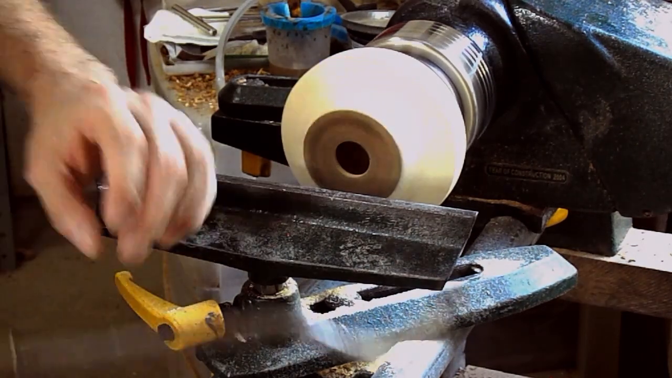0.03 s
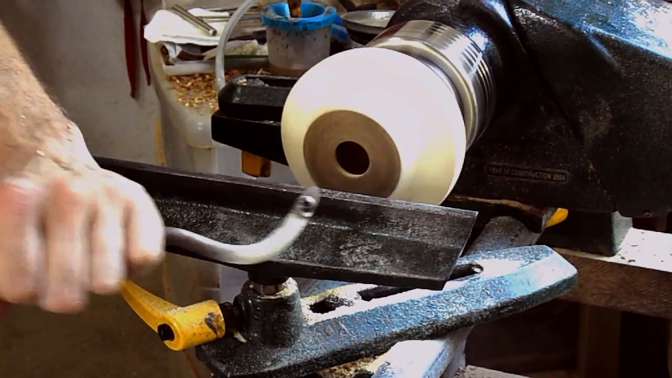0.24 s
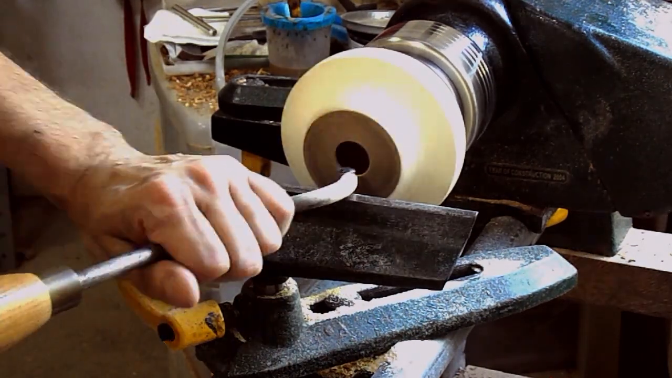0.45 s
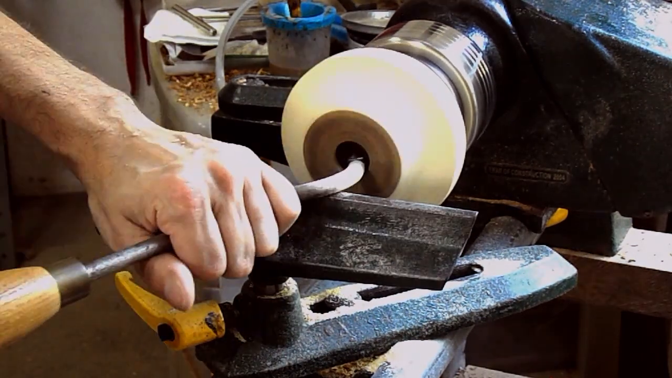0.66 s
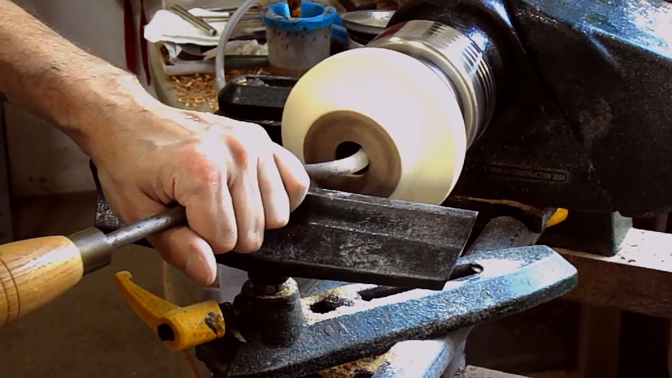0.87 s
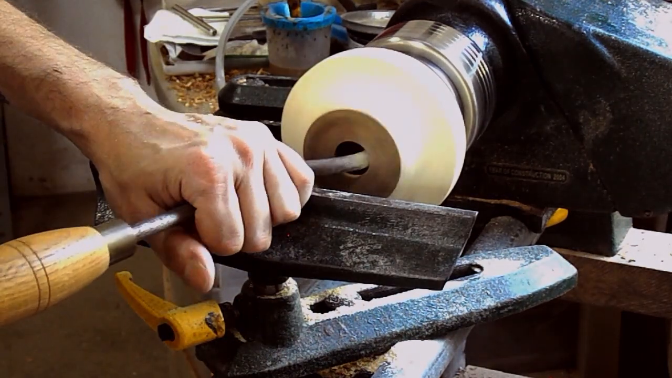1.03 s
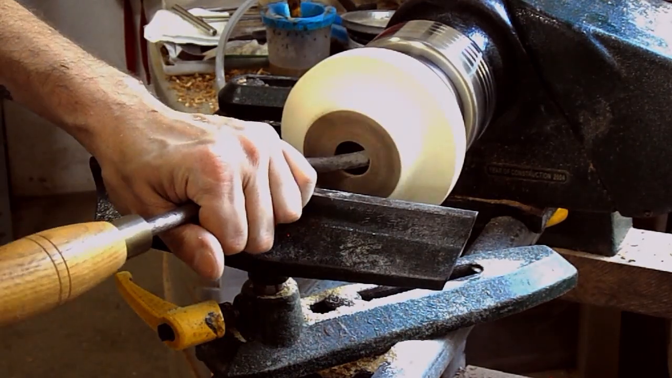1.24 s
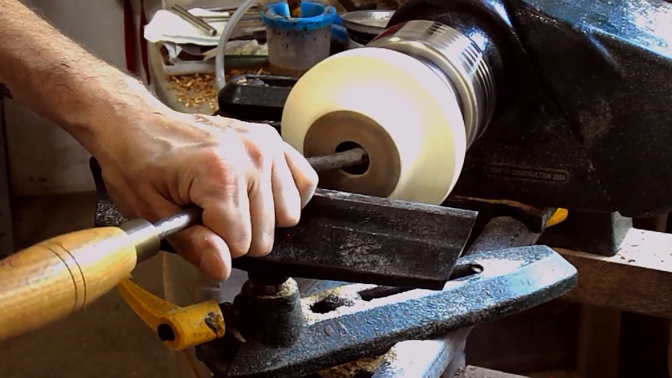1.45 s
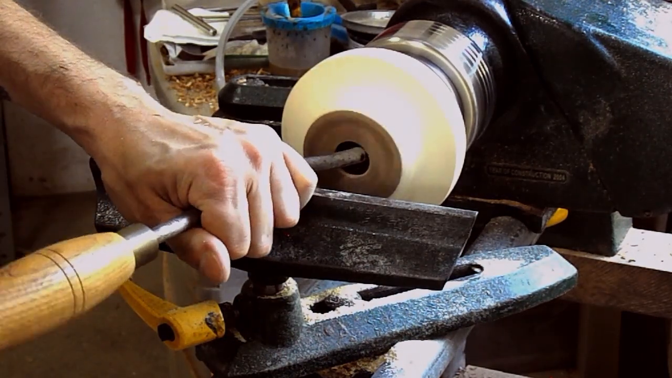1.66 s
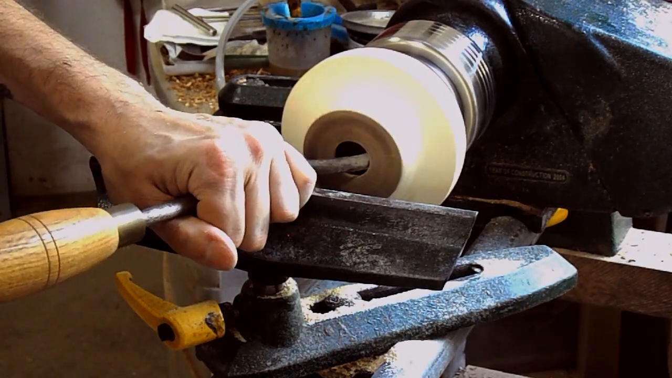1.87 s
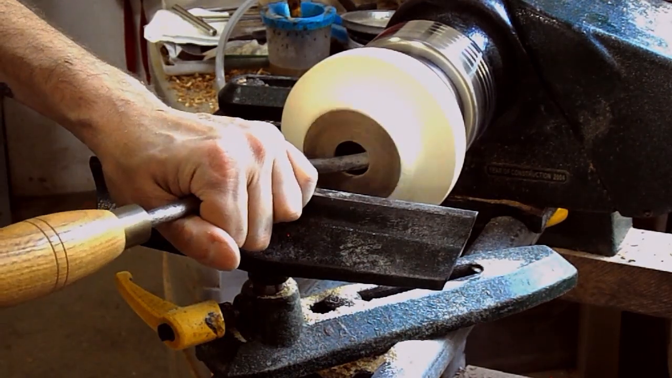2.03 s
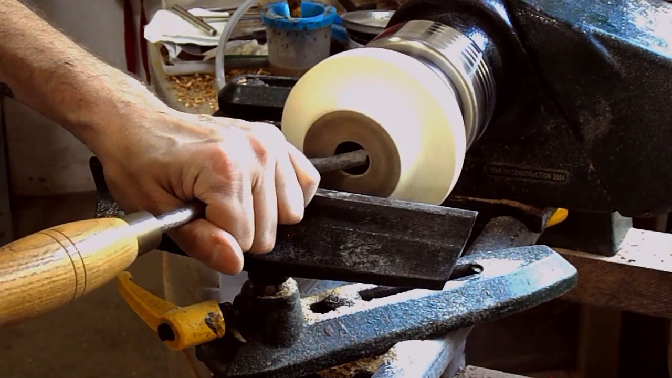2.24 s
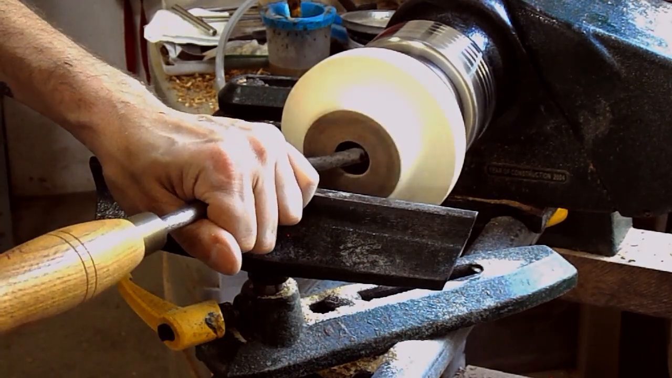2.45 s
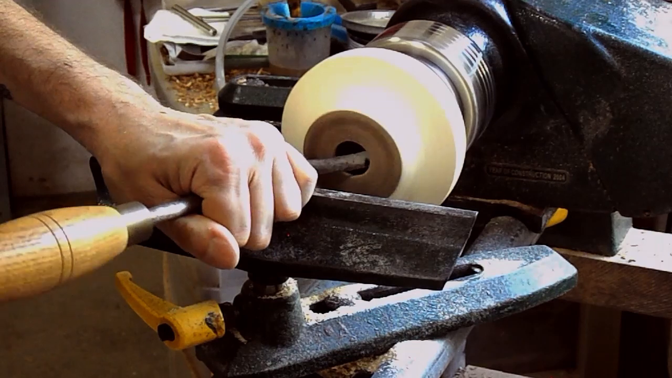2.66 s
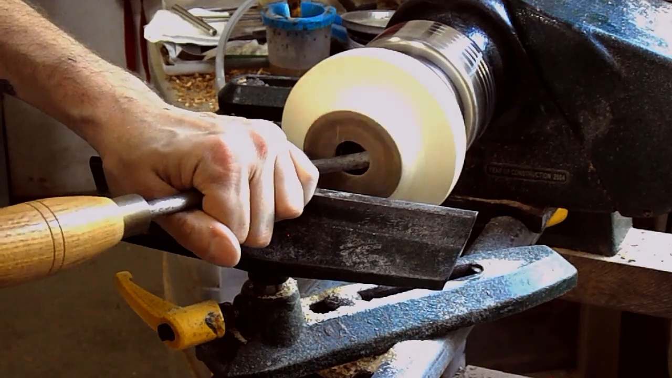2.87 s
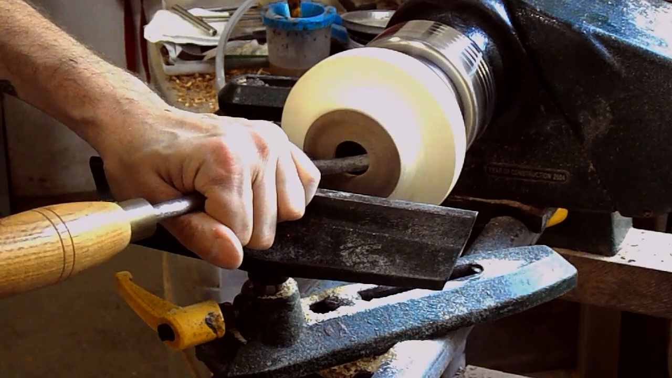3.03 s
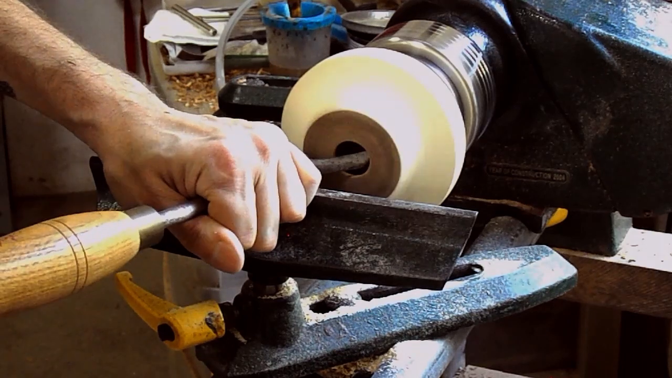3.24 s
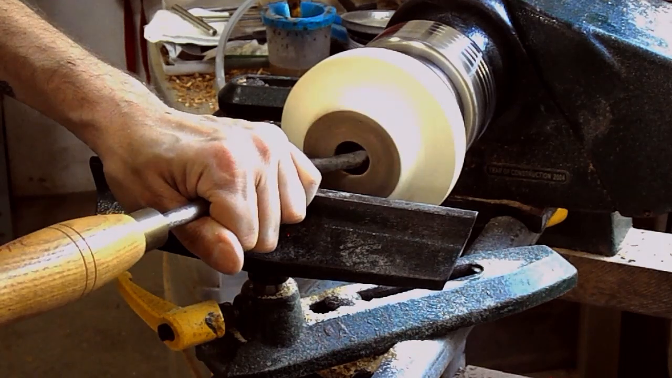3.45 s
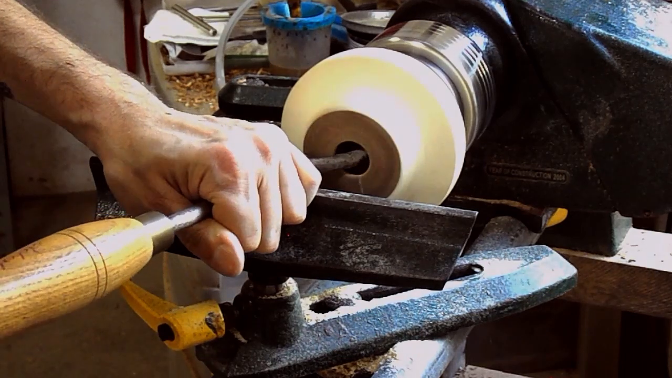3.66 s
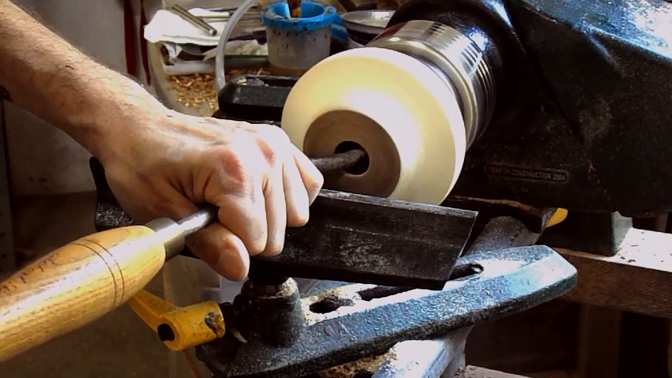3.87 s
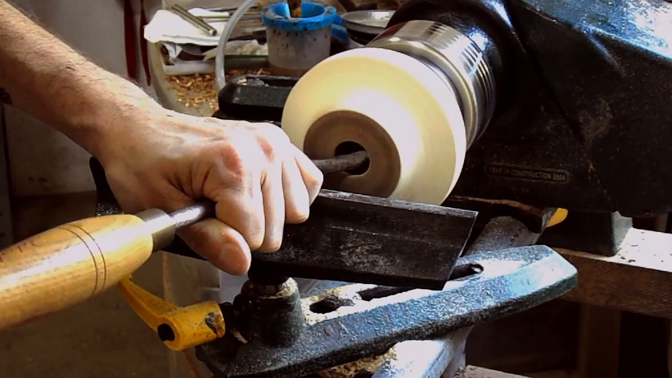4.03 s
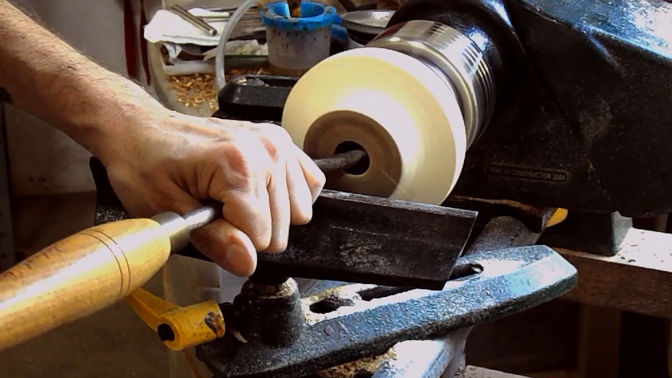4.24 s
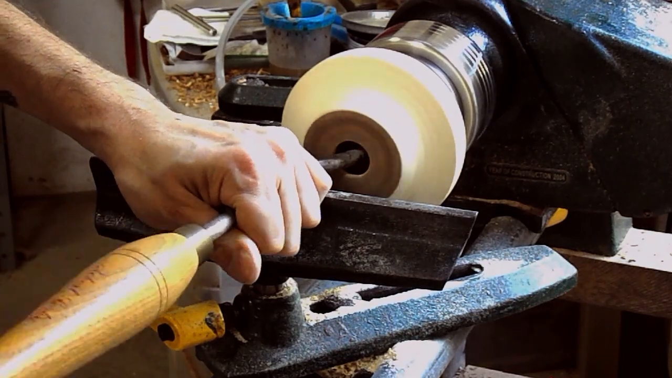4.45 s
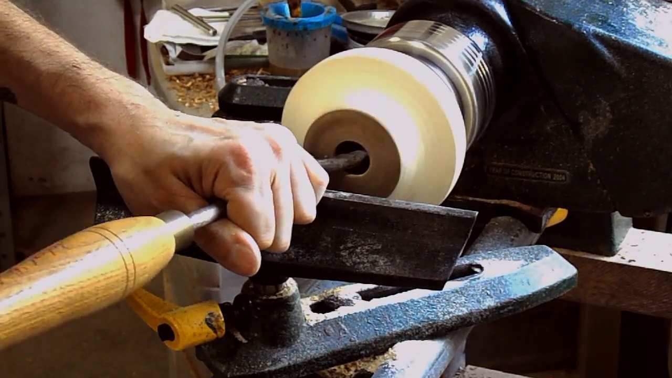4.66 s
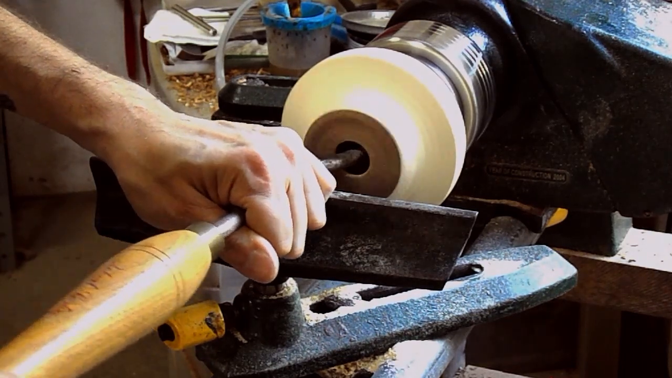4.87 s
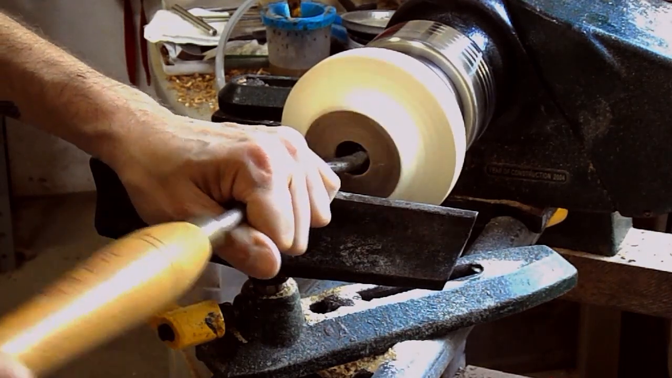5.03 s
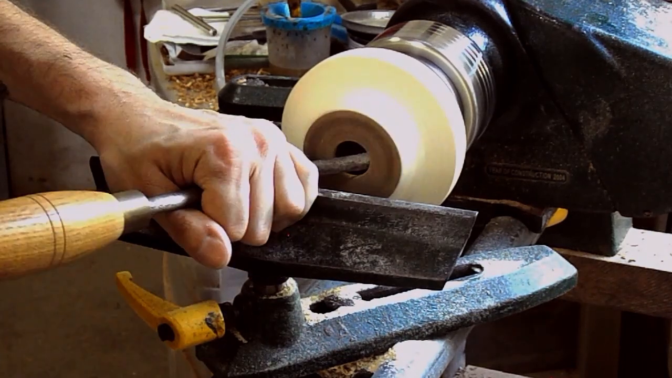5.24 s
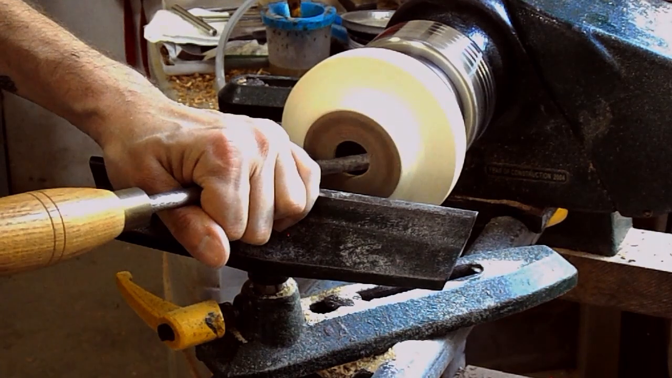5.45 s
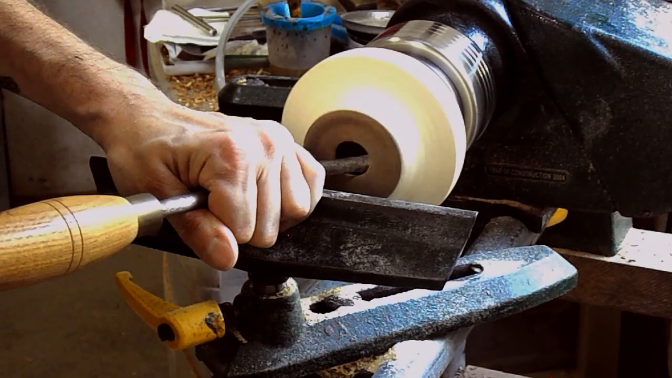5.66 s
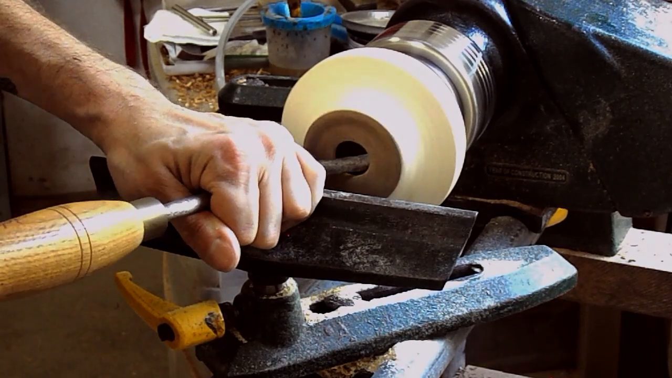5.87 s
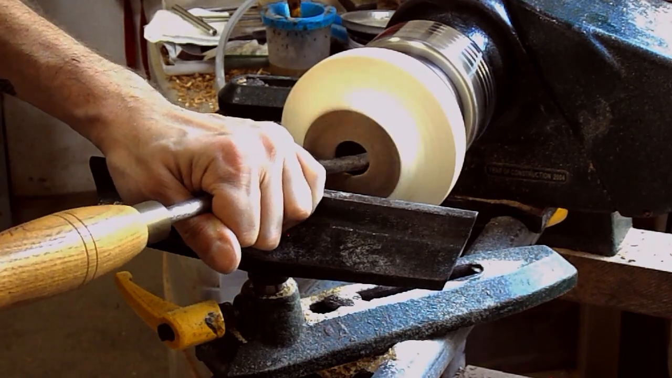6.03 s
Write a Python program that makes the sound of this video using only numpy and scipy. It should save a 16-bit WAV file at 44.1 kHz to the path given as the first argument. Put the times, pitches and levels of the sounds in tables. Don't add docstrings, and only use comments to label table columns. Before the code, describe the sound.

A wood lathe hisses and whines steadily while a hooked tool hollows a spinning piece in bright, raspy bursts with sharp spitting catches.

```python
import sys
import numpy as np
from scipy import signal
from scipy.fft import rfft, irfft, next_fast_len
from scipy.io import wavfile
from scipy.ndimage import uniform_filter1d

SR = 44100
rng = np.random.default_rng(int(sys.argv[2]) if len(sys.argv) > 2 else 0)


def file_out(sig):
    cols = np.atleast_2d(sig).T
    lim = np.clip(cols, -1, 1)
    pcm = np.round(lim * 32767).astype(np.int16)
    wavfile.write(sys.argv[1], SR, pcm)


def boost_factor(decibels):
    exponent = np.asarray(decibels, float) / 20
    return 10 ** exponent


N = 268993


def rms_one(x):
    return x / np.sqrt(np.mean(x ** 2) + 1e-20)


def in_time(rows, **ends):
    times, *columns = np.transpose(rows)
    t = np.arange(N) / SR
    return [np.interp(t, times, column, **ends) for column in columns]


def at_hz(points, hz):
    point_hz, point_db = np.transpose(points)
    return np.interp(np.log(hz + 1), np.log(point_hz), point_db)


def drift(rate):
    step = 40
    r = np.exp(-2 * np.pi * step * rate / SR)
    slow = signal.lfilter([1], [1, -2 * r, r * r], rng.standard_normal(N // step + 2002))[2000:]
    return np.interp(np.arange(N) / step, np.arange(len(slow)), rms_one(slow))


def coloured(x, spectrum, lifts, low_hz, high_hz):
    size = next_fast_len(N)
    hz = np.fft.rfftfreq(size, 1 / SR)
    db = at_hz(spectrum, hz)
    for f, width, lift_db in lifts:
        db = db + lift_db / (1 + (2 * (hz - f) / width) ** 2)
    z = rfft(x, size) * boost_factor(db)
    inside = abs(z[:, (hz > low_hz) & (hz < high_hz)]) ** 2
    return irfft(z, size)[:, :N] * size / np.sqrt(np.sum(inside))


def resonate(x, hz, width):
    r = np.exp(-np.pi * width / SR)
    poles = [1, -2 * r * np.cos(2 * np.pi * hz / SR), r * r]
    return signal.lfilter([(1 - r * r) / 2, 0, (r * r - 1) / 2], poles, x)


def paired(x, turn=8.5):
    walk = turn * np.cumsum(rng.standard_normal(N)) / np.sqrt(SR)
    walk = uniform_filter1d(walk, size=256)
    whole = signal.hilbert(x, next_fast_len(N))[:N]
    sides = np.array([[1], [-1]])
    return np.real(whole * np.exp(.5j * walk * sides))


def hum(modes, steady, turn):
    out = 0
    for hz, width, db in modes:
        tone = resonate(rng.standard_normal(N), hz, width)
        tone = rms_one(resonate(tone, hz, 3 * width))
        height = np.sqrt(uniform_filter1d(tone ** 2, size=400) + 0.023)
        out = out + boost_factor(db) * rms_one(tone / height ** steady)
    return paired(rms_one(out), turn)


def grains(per_s, spread_db, alike_hz):
    size_db = spread_db * np.minimum(rng.exponential(1, (3, N)), 4)
    sizes = boost_factor(size_db) * rng.standard_normal((3, N))
    x = rms_one(sizes * (rng.random((3, N)) < per_s / SR))
    low, high = (signal.butter(1, alike_hz, kind, fs=SR) for kind in ("low", "high"))
    return signal.lfilter(*low, paired(x[0])) + signal.lfilter(*high, x[1:])


# f [Hz], level [dB per Hz]
MACHINE = [(25, -50), (60, -28.5), (120, -16), (200, -14), (330, -2), (480, -9), (700, -10.5), (1000, 0.5),
           (1300, -13), (2000, -11), (2400, -15.5), (3800, -15.5), (5200, -17), (12000, -19),
           (16000, -24.5)]
# f [Hz], width [Hz], lift [dB]
CASTING = [(258, 20, 5), (358, 50, 5), (555, 25, 5), (661, 25, 5), (754, 20, 5), (1403, 30, 4),
           (1785, 40, 4), (1934, 60, 7), (2090, 50, 4), (2380, 35, 4), (4120, 120, 7), (4500, 450, 5),
           (5950, 300, 3), (3000, 1300, -3)]
# f [Hz], width [Hz], level [dB]
WHINE_MODES = [(932, 16, -9), (984, 5, 0), (1038, 7, -5), (445, 5, -3)]


def lathe():
    hiss = coloured(grains(per_s=47000, spread_db=2.1, alike_hz=1040), MACHINE, CASTING, 25, 21000)
    whine = hum(WHINE_MODES, steady=0.42, turn=7.4)
    hiss_db = -42.5 + 0.5 * drift(4.1)
    whine_db = -45.5 + 0.53 * drift(2.5)
    return boost_factor(hiss_db) * hiss + boost_factor(whine_db) * whine


# t [s], peak level [dB]
SLAPS = [(0.099, -50), (0.241, -55), (0.37, -21), (0.476, -51), (0.571, -27), (0.719, -48), (0.818, -46),
         (0.959, -57), (1.078, -42), (1.248, -25), (1.909, -42), (2.015, -38), (2.751, -56), (5.157, -44)]
# f [Hz], level [dB], t60 [s]
PULLEY_COVER = [
    (335, 0, .12),
    (362, -1, .1),
    (558, -4, .07),
    (665, -4, .07),
]


def slaps():
    push = np.zeros(N)
    push[[round(s * SR) for s, db in SLAPS]] = boost_factor(np.array(SLAPS)[:, 1] - 16.5)
    push = np.convolve(push, np.hanning(40) / 20)[:N] + 1e-18
    out = 0
    for hz, db, t60 in PULLEY_COVER:
        r, w = boost_factor(-60 / (t60 * SR)), 2 * np.pi * hz / SR
        out = out + boost_factor(db) * signal.lfilter([0, np.sin(w)], [1, -2 * r * np.cos(w), r * r], push)
    no_boom = signal.butter(4, 240, "high", fs=SR, output="sos")
    return paired(signal.sosfilt(no_boom, out))


# start t [s], end t [s], push level [dB], hollow ring level [dB]
PUSHES = [(.05, 0.157, -62, -37.5), (0.363, 0.79, -52, -48.5), (0.924, 1.028, -52, -41),
          (1.025, 1.354, -47.5, -46), (1.471, 1.548, -39.5, -27), (1.56, 1.645, -36.5, -31.5),
          (1.953, 2.217, -45.5, -40), (2.274, 2.417, -37.5, -27), (2.413, 2.615, -34.5, -30),
          (2.87, 3.122, -38.5, -35.5), (3.297, 3.423, -36.5, -29.5), (3.445, 3.7, -38.5, -33),
          (3.73, 3.996, -37.5, -29.5), (4.165, 4.315, -37, -28.5), (4.32, 4.501, -39, -33),
          (4.687, 4.75, -35.5, -30), (4.78, 4.858, -35, -28), (4.88, 4.927, -44, -33),
          (5.396, 5.533, -36, -39), (5.588, 5.798, -34.5, -27.5), (5.787, 5.877, -38, -27),
          (5.944, 6.008, -44.5, -29)]
PUSH_RISE_DB_PER_S, PUSH_FALL_DB_PER_S, RESTING_DB, HOLLOW_RESTING_DB = 202, 185, -60.5, -50.5


def held(column, resting_db):
    t, out = np.arange(N) / SR, np.full(N, float(resting_db))
    for row in PUSHES:
        before, after = np.maximum(row[0] - t, 0), np.maximum(t - row[1], 0)
        out = np.maximum(out, row[column] - PUSH_RISE_DB_PER_S * before - PUSH_FALL_DB_PER_S * after)
    return out


# t [s], tearing level [dB]
STROKES = [
    [(1.3, -61), (1.44, -31), (1.448, -25), (1.508, -26.5), (1.562, -39.5), (1.616, -35), (1.64, -40),
     (1.67, -30.5), (1.75, -73)],
    [(2.15, -51), (2.258, -37.5), (2.266, -37), (2.296, -31.5), (2.378, -35), (2.416, -26.5), (2.602, -30),
     (2.654, -64), (2.7, -70)],
    [(3.3, -42), (3.344, -51), (3.36, -37.5), (3.39, -45), (3.422, -43), (3.442, -27), (3.45, -31),
     (3.62, -28.5)],
    [(3.62, -32), (3.624, -28), (3.814, -29.5), (3.896, -25), (3.918, -32.5), (3.958, -28), (4.026, -37.5),
     (4.08, -73)],
    [(4.09, -57), (4.166, -30), (4.202, -32.5), (4.252, -26), (4.422, -29.5), (4.434, -34.5), (4.538, -34),
     (4.58, -64.5)],
    [(4.59, -65), (4.642, -32.5), (4.672, -32.5), (4.764, -25), (4.814, -31), (4.83, -30), (5.004, -35),
     (5.08, -69)],
    [(5.34, -54), (5.356, -67), (5.374, -44), (5.46, -43), (5.52, -60)],
    [(5.72, -53), (5.848, -49), (5.856, -39), (5.926, -46.5), (6.1, -45)],
]


def depth():
    cut = sum(boost_factor(in_time(stroke, left=-200, right=-200)[0]) for stroke in STROKES)
    rub = boost_factor(held(column=2, resting_db=RESTING_DB) - 11.5)
    return 20 * np.log10(np.hypot(cut, rub))


# f [Hz], level [dB per Hz]
RUMBLE = [(18, -83), (30, -55), (76, -50.5), (207, -18), (326, -4), (386, -6), (434, -5.5), (789, -18.5),
          (955, -16.5), (1430, -21), (2050, -24.5), (4610, -33.5), (9000, -67.5), (11700, -36),
          (19800, -120)]
# f [Hz], width [Hz], lift [dB]
REST = [(252.6, 18, 8.5), (337.6, 26, 6.5), (546, 25, 6.5), (655.4, 5.8, 15.5), (948, 13, 17.5),
        (2096, 15, 11)]
# f [Hz], width [Hz], level [dB]
HOLLOW = [(423, 24, 0), (444, 18, -4), (520, 110, -9)]
HOLLOW_FOLLOWS, LIGHT_CUT_DB = 0.65, -41.5


def pressure():
    rumble_db = held(column=2, resting_db=RESTING_DB) - 0.58 + 0.5 * drift(39)
    ring_db = held(column=3, resting_db=HOLLOW_RESTING_DB) - 1.0 + 0.15 * drift(47)
    ring_db = ring_db + HOLLOW_FOLLOWS * (np.maximum(depth(), LIGHT_CUT_DB) + 30)
    judder = coloured(grains(per_s=9000, spread_db=0.66, alike_hz=1300), RUMBLE, REST, 200, 353)
    power = np.mean(judder ** 2, axis=0)
    swell = uniform_filter1d(power, size=900) / np.mean(power)
    judder = judder / (swell + .05) ** .3
    ring = hum(HOLLOW, steady=.85, turn=5.5)
    return boost_factor(rumble_db) * judder + boost_factor(ring_db) * ring


# f [Hz], level [dB per Hz]
TEAR = [(300, -40), (600, -10), (1000, -5), (1400, -9), (1900, -5), (2350, -8), (3000, -5), (3600, -7),
        (4050, -2), (5000, -4), (5300, -10), (7500, -8.5), (10000, -15), (13000, -18), (16000, -21)]
# f [Hz], width [Hz], lift [dB]
TOOL = [(1840, 70, 5), (2090, 70, 5), (3095, 60, 4), (3430, 50, 5), (3695, 60, 5), (3877, 40, 4),
        (4012, 40, 5), (4147, 45, 4), (4333, 25, 8), (4785, 30, 5), (5119, 35, 5), (5890, 300, 6),
        (7285, 40, 4), (8280, 120, 2)]


def through_tool(x):
    return coloured(x, TEAR, TOOL, 2500, 8000)


# t [s], peak level [dB], tool ring f [Hz], length [s]
CATCHES = [(1.363, -25, 3680, 0.039), (1.394, -21.5, 5800, 0.011), (1.453, -37, 2070, 0.009),
           (1.583, -21.5, 2070, 0.034), (1.5987, -17, 3670, 0.015), (1.611, -15.5, 3660, 0.016),
           (2.264, -14, 3930, 0.014), (2.358, -23, 3010, 0.018), (2.381, -25, 3700, 0.015),
           (2.391, -19, 3440, 0.031), (2.472, -10.5, 5030, 0.016), (2.526, -15.5, 4400, 0.026),
           (2.561, -11.5, 4550, 0.016), (2.59, -16.5, 4750, 0.026), (3.504, -20, 4200, 0.0086),
           (3.573, -18, 4000, 0.013), (3.63, -15, 4020, 0.037), (3.695, -13, 3670, 0.011),
           (3.763, -10, 4530, 0.017), (3.824, -18, 4270, 0.044), (3.872, -16, 4100, 0.04),
           (3.944, -16.5, 3920, 0.029), (4.148, -15.5, 3120, 0.022), (4.164, -19.5, 4140, 0.014),
           (4.358, -12, 4000, 0.012), (4.632, -18, 2900, 0.017), (4.649, -19.5, 3000, 0.036),
           (4.696, -18, 4930, 0.029), (4.748, -11.5, 4300, 0.026), (4.846, -20, 4200, 0.022)]
# t [s], peak level [dB], ring f [Hz], length [s]
TICKS = [(.381, -27, 3680, .014), (2.905, -27, 3430, .025), (5.373, -30, 2750, .04),
         (5.415, -30, 2085, .045), (5.436, -23, 3150, .04), (5.458, -26, 2950, .015),
         (1.358, -32, 7500, .04), (2.222, -32, 2910, .015), (3.434, -22, 4600, .015),
         (4.123, -32, 2130, .015), (4.638, -27, 7000, .015), (5.61, -35, 3300, .01),
         (5.772, -33, 3800, .02), (5.854, -28, 7600, .012), (1.425, -30, 7500, .03), (3.52, -28, 7500, .04)]
# t [s], peak level [dB], ring f [Hz], length [s]
SKIPS = [
    (2.326, -16.5, 4030, .014),
    (3.356, -21, 3000, .014),
    (5.804, -19.5, 3380, .012),
    (5.852, -16.5, 3550, 0.01),
    (5.87, -22, 3480, 0.0075),
    (5.886, -19, 3380, 0.007),
]


def catches():
    out = np.zeros((2, N))
    bright = through_tool(rng.standard_normal((2, N)))
    dull = signal.sosfilt(signal.butter(3, 7500, fs=SR, output="sos"), bright)
    t = np.arange(4096) / SR
    # events, their noise, ring against spit in dB, broad ring width in Hz
    kinds = [(TICKS, dull, 10, 300), (CATCHES, bright, -4, 600), (SKIPS, dull, 0, 1500)]
    for rows, noise, ring_db, broad_hz in kinds:
        for s, db, hz, length in rows:
            i, length = round(s * SR), np.clip(length, .003, .05)
            shape = (1 - np.exp(-t / .0012)) * np.exp(-(t / length) ** 1.6)
            spit = noise[:, i:i + 4096] * shape[:N - i]
            ring = 1.4 * resonate(spit, hz, broad_hz) + 3 * resonate(spit, hz, 130)
            mix = boost_factor(-ring_db) * spit + boost_factor(ring_db / 1.27 - 4.0) * ring
            out[:, i:i + 4096] += boost_factor(db - 15.0) * mix
    return out


def patchy(x, patch_db):
    hz, s, z = signal.stft(x, SR, nperseg=256)
    patches = uniform_filter1d(rng.standard_normal(z.shape[1:]), size=4, axis=0)
    patches = uniform_filter1d(patches, size=12, axis=1)
    return signal.istft(z * boost_factor(patch_db * rms_one(patches)), SR, nperseg=256)[1][:, :N]


# depth level [dB], brightness [dB], grip on the chuck [dB]
DEPTH_COLOUR = [(-73, -4.5, -16.5), (-56, 3, -11.5), (-29.5, -5, -7.5), (-31.5, -2, -2.5),
                (-20.5, 2.5, 1.5)]
# brightness [dB], grip [dB]
STROKE_COLOUR = [(1, 2.8), (.4, 2.2), (-1, 2), (.3, 2), (-1, 0.2), (3, 2), (-1, -7), (-2, 0)]
TURNS_PER_S = 16.77
LATE_BRIGHT_DB, LATE_GRIP_DB = 2.5, -1.5
CHATTER_DB, CHATTER_PER_S = 1.02, 113


def cutting():
    tear_db = depth()
    law_db, *law_colours = np.transpose(DEPTH_COLOUR)
    bright_db, grip_db = (np.interp(tear_db, law_db, colour) for colour in law_colours)
    for stroke, (more_bright_db, more_grip_db) in zip(STROKES, STROKE_COLOUR):
        start, end = stroke[0][0], stroke[-1][0]
        on, late = in_time([(start, 1, 0), (end, 1, 1)], left=0, right=0)
        bright_db = bright_db + on * more_bright_db + LATE_BRIGHT_DB * late ** 1.8
        grip_db = grip_db + on * more_grip_db + LATE_GRIP_DB * late ** 2.6

    tear = through_tool(grains(per_s=14000, spread_db=2.2, alike_hz=1400))
    tear = patchy(tear, patch_db=1.8)
    top = signal.sosfilt(signal.butter(2, 5600, "high", fs=SR, output="sos"), tear)
    tear = tear + (boost_factor(np.clip(bright_db, -15, 9)) - 1) * top
    chuck = signal.sosfiltfilt(signal.butter(2, [3600, 5300], "band", fs=SR, output="sos"), tear)
    tear = tear + (boost_factor(np.clip(grip_db, -10, 4)) - 1) * chuck

    angle = 2 * np.pi * TURNS_PER_S * np.arange(N) / SR
    turn_db = 0.069 * np.cos(angle + 1.6) + 0.28 * np.cos(3 * angle + 2.9)
    flutter_db = 0.6 * drift(20) + CHATTER_DB * drift(CHATTER_PER_S)
    return boost_factor(tear_db + 1.0 + turn_db + flutter_db) * tear


def scene():
    return lathe() + slaps() + pressure() + catches() + cutting()


def top_cut(x):
    return signal.sosfilt(signal.butter(12, 16350, fs=SR, output="sos"), x)


# f [Hz], left minus right level [dB]
LEAN = [(200, -3), (700, -3.5), (1290, -1.5), (2400, -6), (4400, -4.5), (8100, -1.5), (15000, 0)]


def record(dry):
    size = next_fast_len(N)
    hz = np.fft.rfftfreq(size, 1 / SR)
    sides = np.array([[1], [-1]])
    response = boost_factor(at_hz(LEAN, hz) / 2 * sides + 0.5)
    response = response * (hz < 15890) * hz / np.hypot(hz, 110)
    rounded = .5 * np.tanh(dry / .5)
    mix = irfft(rfft(rounded, size) * response, size)[:, :N]
    return top_cut(mix)


dry = scene()
out = record(dry)
file_out(out)
```